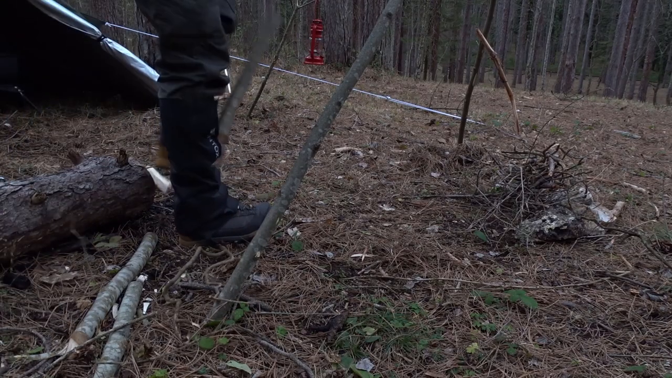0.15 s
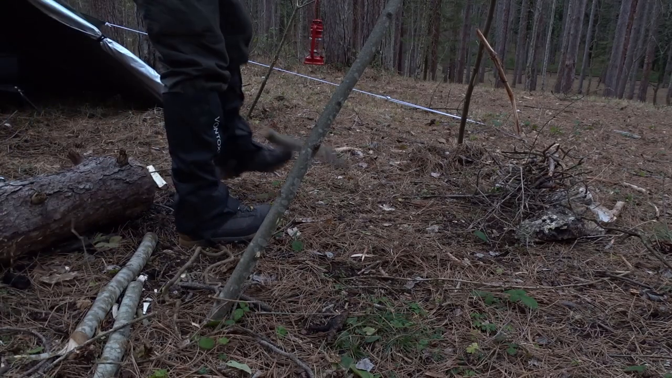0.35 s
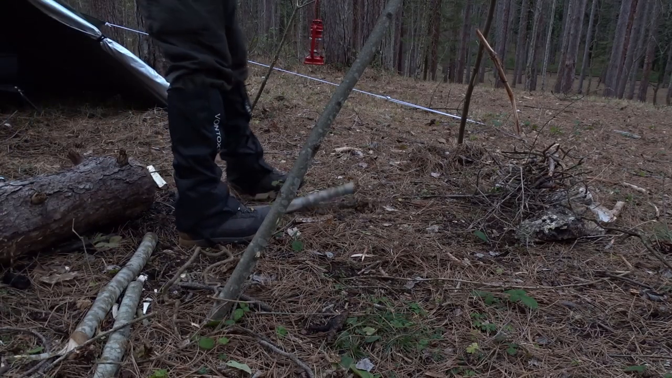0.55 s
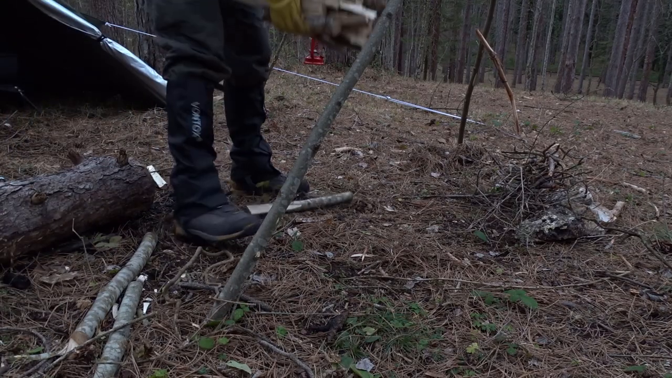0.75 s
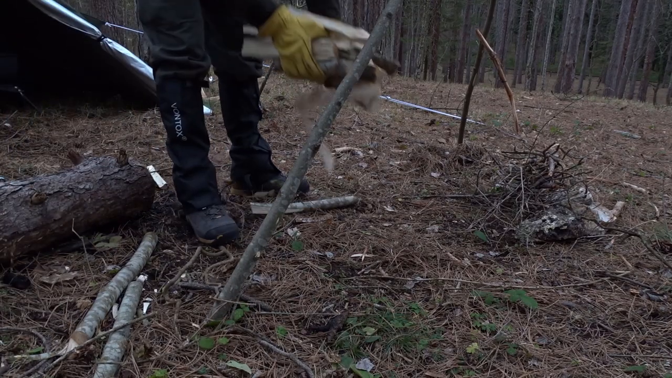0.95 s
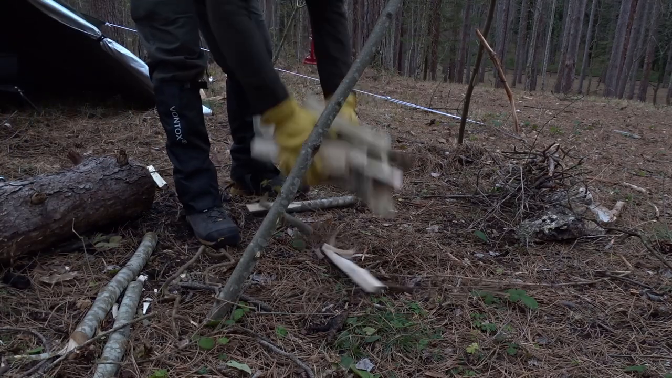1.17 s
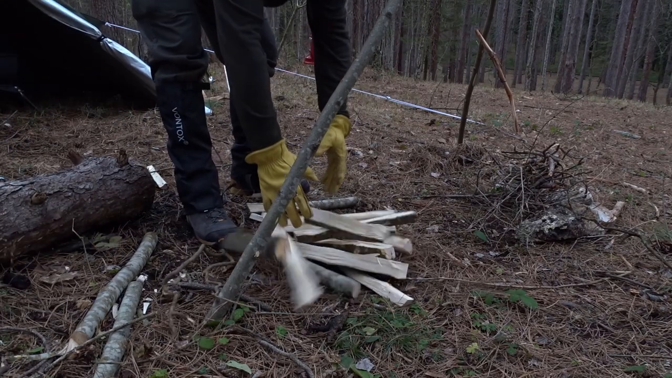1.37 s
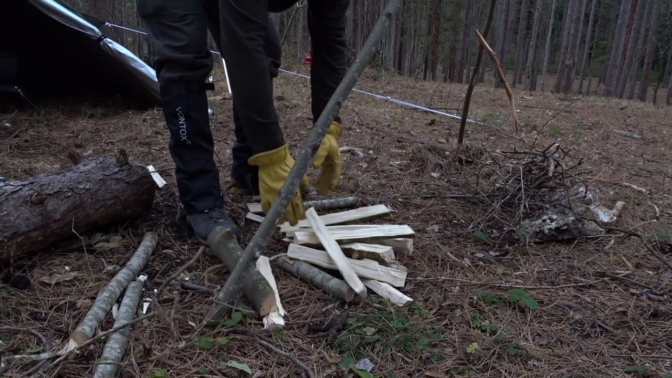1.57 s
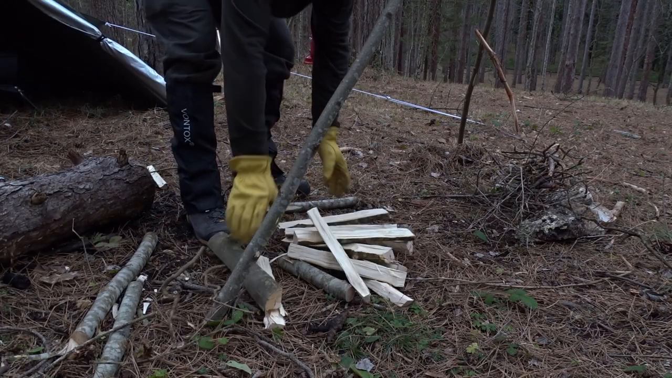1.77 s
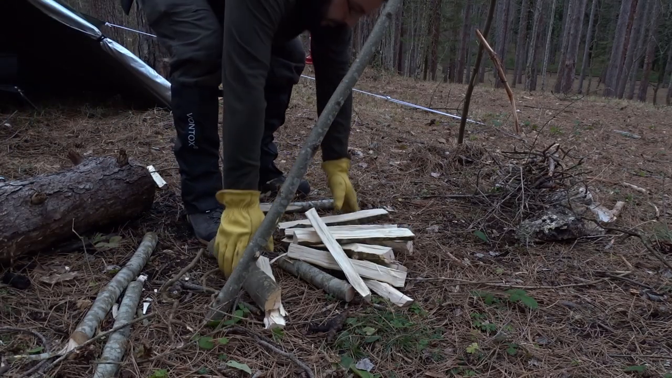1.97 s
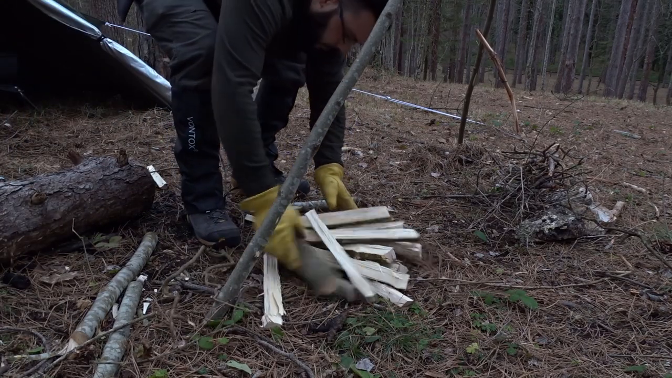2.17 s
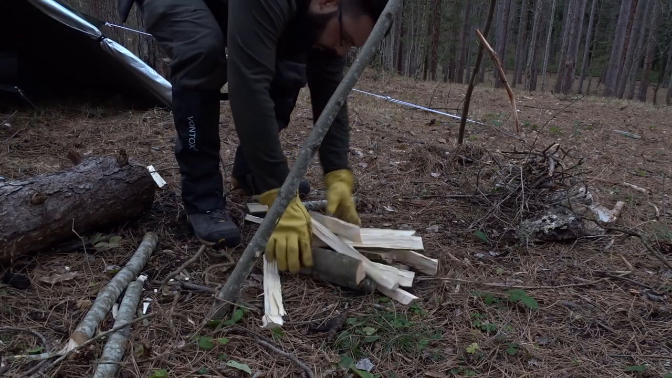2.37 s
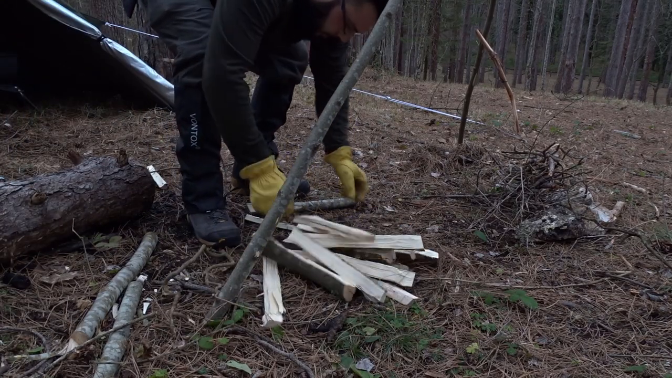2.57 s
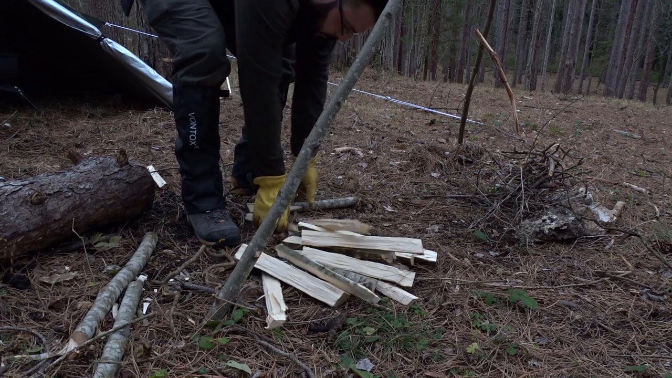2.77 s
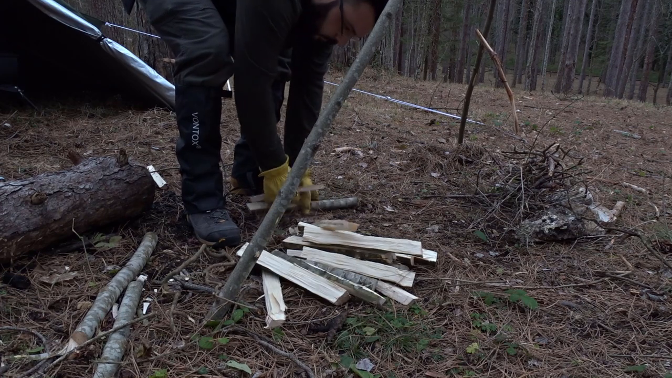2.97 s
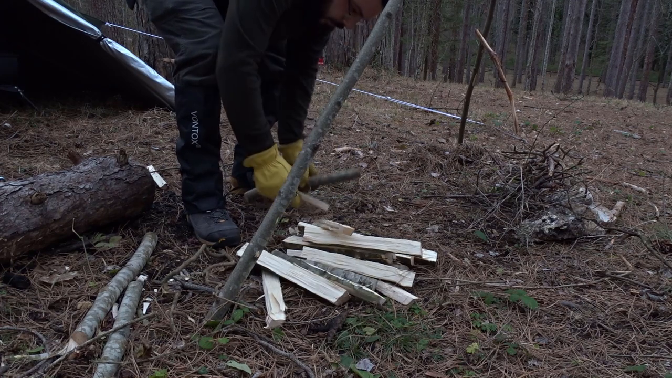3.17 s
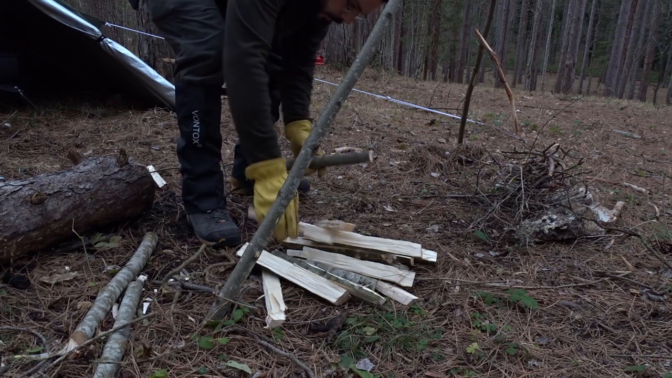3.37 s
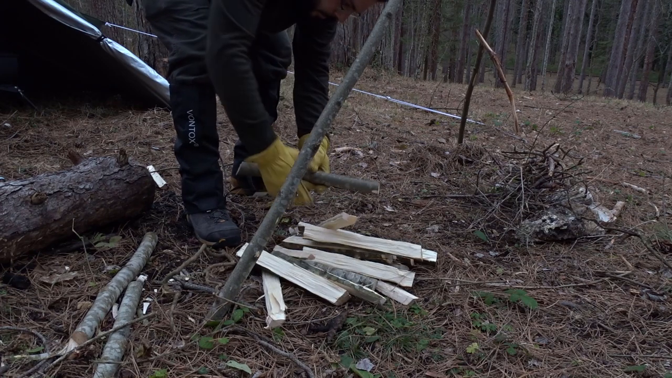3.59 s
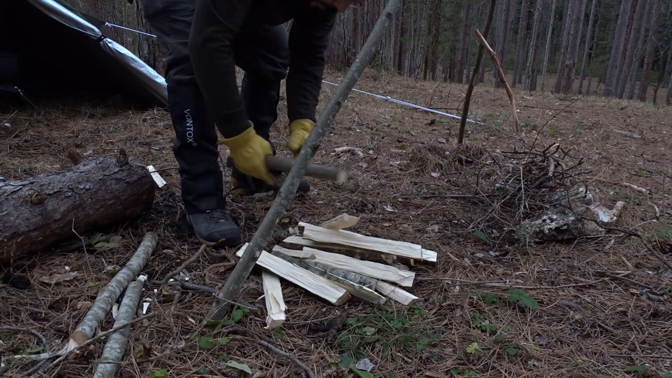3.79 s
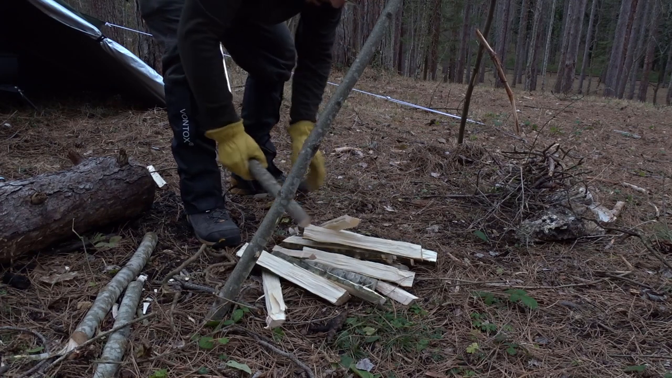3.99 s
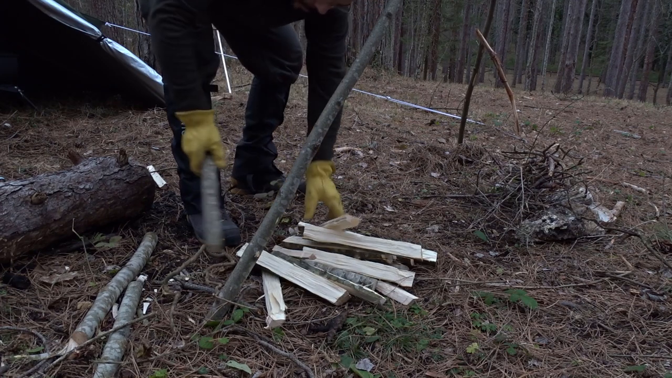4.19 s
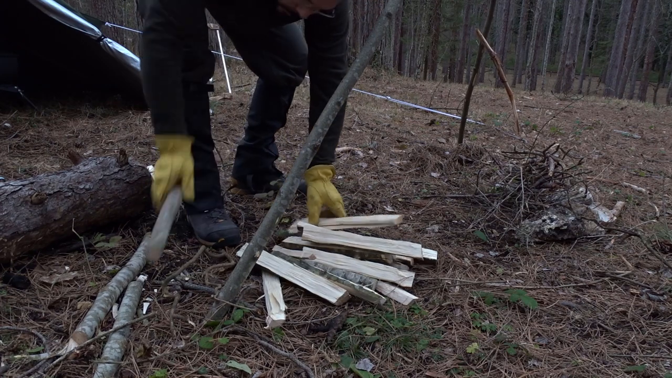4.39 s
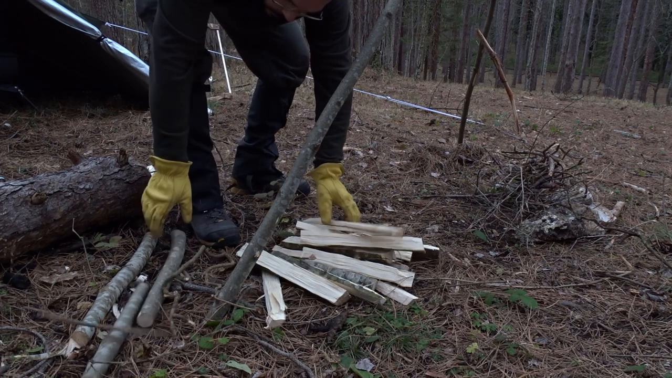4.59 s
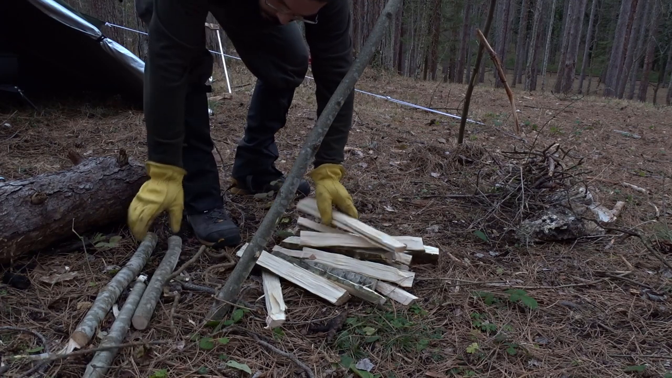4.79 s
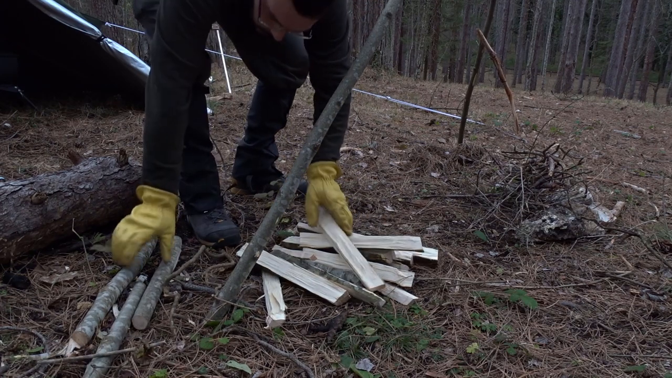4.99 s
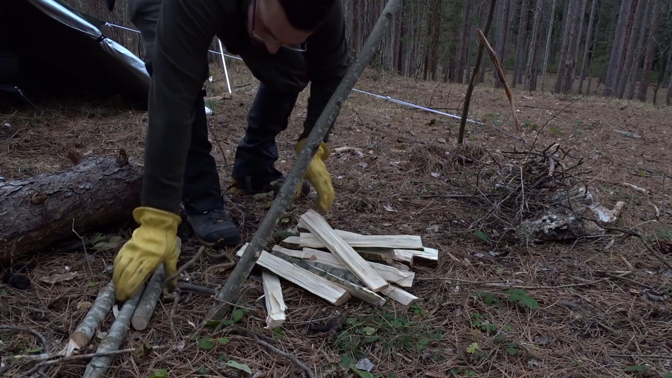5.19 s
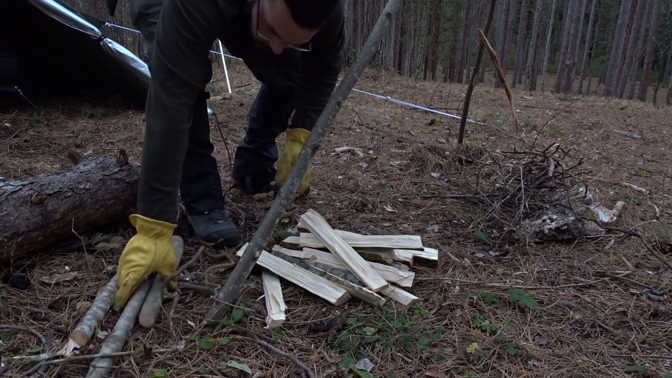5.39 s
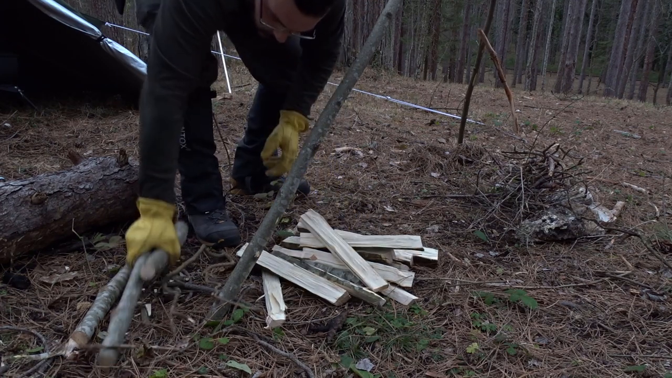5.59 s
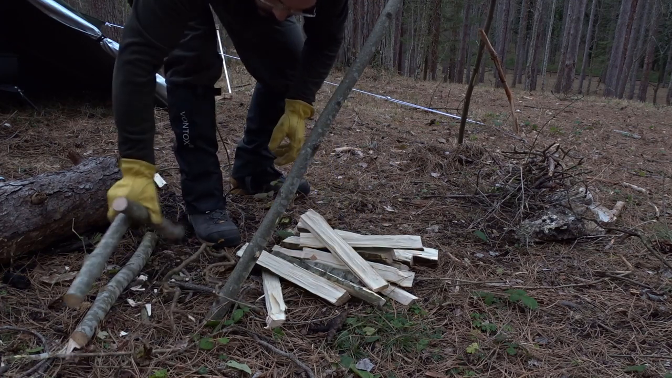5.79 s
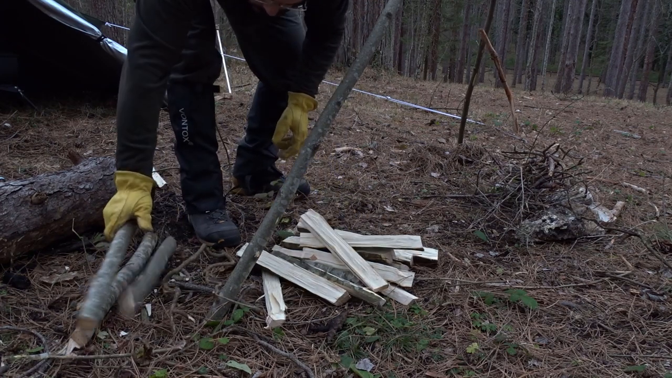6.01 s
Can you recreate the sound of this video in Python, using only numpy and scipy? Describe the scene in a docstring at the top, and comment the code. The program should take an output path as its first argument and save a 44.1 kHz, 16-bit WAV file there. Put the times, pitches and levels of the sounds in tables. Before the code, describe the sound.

An armful of dry split firewood clatters onto needle-covered forest ground, then pieces are shifted and knocked together, ending with a bright woody clonk.

```python
"""In a forest, split firewood is dropped on pine needles and arranged by gloved hands.
Pieces knock, ring and clatter as decaying tones with bursts of noise; twigs snap and the ground thuds.
Shaped noise makes the needles, scraping wood, rubbing gloves and light wind; rubbed surfaces squeak.
Faint echoes follow the blows. Both channels share the scene, each with a little hiss,
and the hardest blows clip."""
import sys
import numpy as np
from scipy import signal
from scipy.fft import rfft, irfft, next_fast_len
from scipy.io import wavfile
from scipy.ndimage import map_coordinates

SR = 44100
rng = np.random.default_rng(int(sys.argv[2]) if len(sys.argv) > 2 else 0)


def waveform_to_disk(signal):
    """Save audio, clipped to [-1, 1], as 16-bit WAV at the path in sys.argv[1]."""
    frames = np.transpose(np.atleast_2d(signal))
    scaled = np.clip(frames, -1, 1) * 32767
    samples = np.round(scaled).astype(np.int16)
    wavfile.write(sys.argv[1], SR, samples)


N = 266805  # length in samples

# Ringing tones of the heap of split pieces: pitch_hz [Hz], relative level_db [dB], t60_s [s to fall 60 dB]
HEAP_MODES = [(659, -6, 0.13), (740, -6, 0.13), (1020, 8, 0.054), (1250, -7, 0.074), (1310, -13, 0.043),
              (1920, -15, .05), (2350, -4, 0.087), (3040, -6.5, 0.022), (4010, -3, 0.023)]
# Small pieces radiate little bass: pitch_hz [Hz], gain_db [dB]
SMALL_PIECE_GAIN = [(30, -30), (300, -6), (550, 0), (22050, 0)]
THUD_T60_S = 0.039  # time for a low push to fall 60 dB


def amp(db):
    """Turn decibels into a plain multiplier."""
    return 10 ** (np.asarray(db) / 20)


def unit(x):
    """Scale a sound to an average (RMS) level of 1."""
    return x / np.sqrt(np.mean(x ** 2) + 1e-20)


def curves(rows):
    """One value per sample for each column after the time; silence outside the rows."""
    time_s, *columns = np.transpose(rows)
    clock = np.arange(N) / SR
    return [np.interp(clock, time_s, column, left=-120, right=-120) for column in columns]


def wobble(rate):
    """A smooth random curve through the given number of random points a second."""
    points = rng.standard_normal(int(N * rate / SR) + 4)
    return map_coordinates(points, [np.arange(N) * rate / SR])


def filtered(x, response):
    """Multiply the spectrum of x by a response that depends on frequency."""
    size = next_fast_len(len(x.T) + 8192)
    spectrum = rfft(x, size) * response(np.fft.rfftfreq(size, 1 / SR))
    return irfft(spectrum, size)[..., :len(x.T)]


def coloured(x, points):
    """Shape x by (Hz, dB) points joined along a logarithmic pitch axis."""
    pitch_hz, gain_db = np.transpose(points)

    def response(hz):
        return amp(np.interp(np.log(hz + 1), np.log(pitch_hz), gain_db, left=-120, right=-120))
    return filtered(x, response)


def ring(hz, t60, t):
    """One damped mode: a sine wave that falls 60 dB in t60 seconds."""
    return np.sin(2 * np.pi * hz * t) * amp(-60 * t / np.clip(t60, .003, .4))


def crackle(spiky_db, grain):
    """Noise made of tiny contacts: short grains of very unequal size, about grain seconds long."""
    size = amp(spiky_db * wobble(1 / grain))
    return unit(size * rng.standard_normal(N))


def wind():
    """Light air buffets the microphone: low noise whose level wanders."""
    # start_s [s], level_db [dB]
    gusts = [(0, -47), (.44, -45), (.94, -54.5), (1.35, -51), (1.58, -54.5), (2.17, -62), (2.8, -59.5),
             (3.28, -55), (3.6, -65.5), (4.24, -61), (4.75, -69), (5.02, -58.5), (6.05, -58.5)]
    # pitch_hz [Hz], relative level_db [dB per Hz]
    buffet_colour = [(8, -22), (25, -1.5), (50, -7.5), (90, -15), (160, -35.5)]
    level_db = curves(gusts)[0] + 2.5 * wobble(10)
    return amp(level_db) * unit(coloured(rng.standard_normal(N), buffet_colour))


def litter():
    """Needles crackle, wood scrapes on wood and the soft ground murmurs under boots and hands."""
    # Steady stirring: start_s [s], needles_db [dB before a final boost], scrape_db [dB], ground_db [dB]
    stirring = [(0, -42.5, -33.5, -50), (.1, -41.5, -47, -49), (.32, -57, -54, -53.5),
                (.45, -52, -47.5, -68), (.66, -45.5, -49.5, -46), (.95, -47, -41.5, -62),
                (1.26, -53, -55.5, -49), (1.4, -43, -34, -44.5), (1.55, -43.5, -41.5, -52),
                (1.7, -52, -53.5, -59), (1.95, -52, -59, -55.5), (2.2, -38.5, -40, -59.5),
                (2.33, -47.5, -40, -54), (2.5, -48, -47.5, -54), (3, -49, -52, -58),
                (3.12, -55.5, -58.5, -60.5), (3.56, -52.5, -48, -58), (3.9, -54, -59.5, -65),
                (4.09, -63, -57, -67), (4.38, -54.5, -52.5, -63.5), (4.55, -57, -56.5, -62),
                (5.15, -51.5, -54.5, -62), (5.45, -57, -55.5, -67.5), (5.75, -61.5, -61, -65.5),
                (6.05, -59.5, -57, -56)]
    # Bursts of crushed needles: peak_s [s], level_db [dB before the same boost],
    # fall_s [s to fall 20 dB; anything under 5 ms counts as 5 ms]
    rustles = [(0, -24, -0.0024), (.05, -44, -0.04), (0.134, -31.5, 0.01), (0.204, -31, 0.063),
               (.235, -44, 0.06), (.27, -59, 0.05), (.5, -45, -0.11), (.585, -48, 0.05), (.94, -34.5, .04),
               (.98, -28, 0.01), (1.11, -44, 0.16), (1.182, -35, 0.02), (1.22, -29, 0.0433),
               (1.33, -20, 0.0124), (1.36, -18.5, 0.01), (1.43, -33.5, .04), (1.48, -36.5, 0.1),
               (1.53, -36.5, 0.0948), (2.156, -36, 0.05), (2.19, -40, 0.13), (2.24, -46, 0.14),
               (2.29, -39.5, 0.16), (2.32, -44, 0.07), (2.345, -42, 0.06), (2.73, -49, 0.17),
               (2.78, -65, 0.2), (2.835, -41.5, 0.07), (2.88, -39, 0.07), (3.045, -50.5, .04),
               (3.31, -54.5, 0.24), (3.5, -45, 0.1), (3.555, -36, 0.02), (3.72, -52, 0.08),
               (3.885, -53, 0.02), (4.17, -56.5, 0.05), (4.38, -50, 0.18), (4.405, -59, 0.1),
               (4.43, -65, 0.4), (4.52, -57, 0.9), (4.577, -29.5, 0.05), (5.25, -64, 0.08),
               (5.28, -52, 0.06), (5.35, -50, 0.09), (5.425, -46, 0.27), (5.48, -48.5, 0.01),
               (5.61, -50.5, -0.08), (5.7, -47.5, -0.03), (5.855, -45.5, -0.08), (5.885, -49.5, 0.1),
               (5.98, -42, -0.1)]
    # Noise colours: pitch_hz [Hz], relative level_db [dB per Hz]
    needle_colour = [(900, -7.5), (1500, -6), (1900, -6.5), (2300, -5.5), (2550, -4), (2850, -0.5),
                     (3050, -3), (3300, -5), (3700, -10.5), (4300, -7), (5500, -9), (7300, -11.5),
                     (9700, -19.5), (12000, -35.5), (15000, -69.5)]
    scrape_colour = [(150, -40), (250, -5.5), (345, -4), (390, -4.5), (669, -6), (995, -8.5), (1580, -10),
                     (1970, -15), (2400, -11.5), (3120, -30), (5280, -120)]
    ground_colour = [(60, -42.5), (100, -4), (200, -1.5), (350, -13.5), (600, -20.5)]
    rise_share = .6  # rise time over fall time

    needles_db, scrape_db, ground_db = curves(stirring)
    clock = np.arange(N) / SR
    bursts = np.zeros(N)
    for peak_s, level_db, fall_s in rustles:
        distance_s = np.maximum(clock - peak_s, (peak_s - clock) / rise_share)
        bursts += amp(level_db - 20 * distance_s / max(fall_s, .005))
    stir = wobble(25)
    needle_level = (amp(needles_db) + bursts) * amp(2.2 * stir)
    needles = needle_level * coloured(crackle(2.45, 0.0023), needle_colour)

    drag = amp(scrape_db)
    unsteady_db = 2.2 * stir + 1.5 * wobble(30)
    scrape = drag * amp(unsteady_db) * unit(coloured(crackle(1.9, .004), scrape_colour))
    # scraping also wakes the modes of the heap in tiny random taps, about 25 a second for each mode
    t = np.arange(SR // 8) / SR
    for hz, level_db, t60 in HEAP_MODES:
        taps = drag * (rng.random(N) < 25 / SR) * rng.standard_normal(N)
        scrape += amp(level_db + 5.5) * signal.fftconvolve(taps, ring(hz, 0.15 * t60, t))[:N]

    lumps_db = 3 * wobble(20)
    ground = amp(ground_db + lumps_db) * unit(coloured(rng.standard_normal(N), ground_colour))
    return amp(11.0) * needles + scrape + ground


def rubs():
    """A glove sliding along a piece keeps one mode humming: noise in one narrow band of pitch."""
    # start_s [s], length_s [s], pitch_hz [Hz], level_db [dB]
    slides = [(2.36, .1, 2850, -52), (3.24, .17, 2500, -56), (3.26, .12, 2950, -57), (3.24, .25, 1330, -57),
              (3.26, .1, 690, -55), (3.58, .08, 1800, -58), (3.78, .15, 2250, -56), (3.8, .11, 2850, -57),
              (4.09, .12, 1800, -62), (4.27, .15, 1050, -55), (4.42, .13, 2300, -58),
              (4.82, .06, 2200, -54), (5.29, .24, 2110, -54), (.47, .06, 2900, -48), (.22, .05, 2900, -42)]
    out = np.zeros(N)
    for start_s, length_s, hz, level_db in slides:
        n = round(length_s * SR)
        carrier = 2 * np.pi * hz * np.arange(n) / SR
        hum = wobble(90)[:n] * np.sin(carrier) + wobble(90)[:n] * np.cos(carrier)
        out[round(start_s * SR):][:n] += amp(level_db) * np.sqrt(np.hanning(n)) * hum
    return out


def squeaks():
    """Rubbing surfaces whistle briefly: short rough tones that glide up as the rubbing speeds up."""
    # start_s [s], length_s [s], start_hz [Hz], end_hz [Hz], level_db [dB before the random flutter]
    whistles = [(.03, .04, 1250, 1400, -38), (.085, .03, 1600, 1800, -38), (.105, .065, 2450, 3350, -31),
                (.133, .02, 1900, 2600, -33), (.125, .03, 3700, 5800, -40), (3.872, .025, 1400, 1420, -45),
                (3.872, .025, 2800, 2850, -48), (4.915, .03, 4300, 4350, -50)]
    out = np.zeros(N)
    flutter = amp(3 * wobble(150))
    pitch_waver = 1 + .015 * wobble(300)
    for start_s, length_s, start_hz, end_hz, level_db in whistles:
        i, n = round(start_s * SR), round(length_s * SR)
        pitch_hz = np.linspace(start_hz, end_hz, n) * pitch_waver[i:i + n]
        phase = 2 * np.pi * np.cumsum(pitch_hz) / SR
        out[i:i + n] += amp(level_db) * np.hanning(n) * np.sin(phase)
    return out * flutter


def trunks(x):
    """Faint echoes from ground and trunks; rough bark and needles scatter phases and smear clear tones."""
    # pitch_hz [Hz], relative level_db [dB]
    echo_colour = [(300, -20), (900, -6.5), (1800, -8), (2600, -6), (3500, -2), (4100, -11), (9000, -17.5)]
    echo_t60_s = .42
    pieces = signal.stft(x, nperseg=96)[2]
    scattered = pieces * np.exp(2j * np.pi * rng.random(pieces.shape))
    smeared = signal.istft(scattered, nperseg=96)[1][:N]
    t = np.arange(SR // 2) / SR
    tail = coloured(rng.standard_normal(len(t)), echo_colour) * amp(-60 * t / echo_t60_s)
    # the echoes start 300 samples (about 7 ms) late
    tail = np.pad(tail / np.linalg.norm(tail), (300, 0))
    return signal.fftconvolve(smeared, tail)[:N]


def thuds():
    """Boots and heavy pieces thump the soft ground, which answers with one short low push."""
    # start_s [s], pitch_hz [Hz], level_db [dB]
    thumps = [(0.04, 157, -22), (.172, 337.6, -19), (.181, 368.6, -27), (.48, 170.2, -22.5),
              (0.581, 144, -25), (.913, 400.4, -24.5), (1.219, 182, -24.5), (1.326, 395, -15.5),
              (1.352, 362.6, -11.5), (1.389, 81.7, -27.5), (1.419, 80.7, -22), (2.31, 388, -27),
              (2.332, 282, -26.5), (2.339, 219.3, -25.5), (2.368, 228.5, -36), (2.494, 224, -34),
              (2.522, 265.7, -31.5), (3.607, 194.8, -37.5), (4.559, 200, -27.5), (4.901, 270, -44),
              (4.319, 385, -31)]
    out = np.zeros(N + SR)
    t = np.arange(SR // 4) / SR
    rise = 1 - np.exp(-t / 0.0005)
    for start_s, hz, level_db in thumps:
        out[round(start_s * SR):][:len(t)] += amp(level_db) * ring(hz, THUD_T60_S, t) * rise
    return out[:N]


def snaps():
    """Dry twigs and splinters snap: a sharp tick and a few milliseconds of bright noise."""
    # start_s [s], level_db [dB]
    breaks = [(.001, -20.5), (.481, -39), (.664, -45.5), (.691, -34.5), (.735, -42), (.763, -32),
              (.786, -36), (.978, -21.5), (1.106, -39), (1.316, -27), (1.326, -21), (1.389, -29.5),
              (1.439, -25.5), (2.152, -25.5), (2.231, -29.5), (2.341, -25.5), (2.467, -43.5), (2.602, -33),
              (2.727, -31), (2.7715, -33.5), (2.893, -36.5), (3.506, -18.5), (3.539, -41), (3.554, -34.5),
              (4.569, -17), (5.224, -43.5), (5.348, -45), (5.418, -38.5), (5.474, -32), (5.599, -46),
              (5.691, -44.5), (5.848, -41.5), (5.969, -46)]
    # pitch_hz [Hz], relative level_db [dB per Hz]
    snap_colour = [(5000, -28.5), (7000, 7), (9500, -3.5), (12000, -19.5), (16000, -41.5)]
    out = np.zeros(N + SR)
    t = np.arange(SR // 20) / SR
    sharp = unit(coloured(rng.standard_normal(N + SR), snap_colour))
    fade = amp(-60 * t / 0.0094) + amp(-5 - 60 * t / 0.00086)
    for start_s, level_db in breaks:
        i = round(start_s * SR)
        now = slice(i, i + len(t))
        out[now] += amp(level_db) * sharp[now] * fade
    return out[:N]


def tumble():
    """Clattering pieces: a dense hail of blows excites the heap, each mode by its own blows."""
    # A list of clatters, each with rows of: time_s [s], relative level_db [dB]
    clatters = [
        [(1.322, -37.5), (1.33, -10.5), (1.343, -2.5), (1.357, 1), (1.372, -10), (1.41, -40)],
        [(.168, -37.5), (.175, -17.5), (.19, -24), (.215, -25), (.245, -51)],
        [(2.2, -53), (2.235, -30.5), (2.246, -26), (2.27, -28), (2.3, -33), (2.34, -30), (2.37, -49.5)],
    ]
    # Noise colours: (Hz, relative dB per Hz)
    clatter_colour = [(100, -18), (700, 3), (3000, -1.5), (8000, -18.5), (16000, -48.5)]
    boom_colour = [(55, -28), (85, -1.5), (140, -1.5), (300, -6.5)]
    t = np.arange(SR // 4) / SR
    force = sum(amp(curves(rows)[0]) for rows in clatters)
    out = force * amp(-6.5) * unit(coloured(crackle(7.5, 0.0027), clatter_colour))
    # the weight of the load booms in the soft ground
    out += force * amp(-23) * unit(coloured(rng.standard_normal(N), boom_colour))
    # about 500 random blows a second for each mode
    for hz, level_db, t60 in HEAP_MODES:
        blows = force * (rng.random(N) < 500 / SR) * rng.standard_normal(N)
        out += amp(level_db - 15.5) * signal.fftconvolve(blows, ring(hz, t60, t))[:N]
    return out


def ringing():
    """A round branch, a thin piece and a split piece lie free enough to ring clearly in several modes."""
    # Modes of each piece: pitch_hz [Hz], relative level_db [dB], t60_s [s to fall 60 dB]
    branch_modes = [(657, -20.5, 0.3), (833, -18.5, 0.22), (1230, -26, 0.16), (1636, -11, 0.21),
                    (1683, -6.5, 0.14), (2014, -1, 0.1), (2450, -25, .08), (2900, -27.5, 0.15),
                    (3220, -25, 0.11)]  # tossed onto others
    slat_modes = [(727, -18.5, 0.19), (1524, -0.5, 0.09), (2886, -1.5, 0.086), (4040, 6, 0.015)]  # thin piece bouncing on the heap
    stick_modes = [(740.4, -5.5, 0.16), (1120, -18, 0.064), (1882, -9, 0.075), (2170, -27, 0.038),
                   (3050, -29, 0.049)]  # split piece set on the pile
    # Blows on branch and thin piece: start_s [s], relative level_db [dB]
    branch_blows = [(4.569, 2.5), (4.71, -35.5)]
    slat_blows = [(1.522, -10.5), (1.534, -24), (1.612, -34)]
    # start_s [s], relative level_db [dB], hardness_db [dB per octave above the first mode]
    stick_blows = [(4.978, -8, 3), (5.061, -8.5, 1.5)]

    out = np.zeros(N + SR)
    t = np.arange(SR // 2) / SR
    rise = 1 - np.exp(-t / 0.000094)
    for blows, modes in ((branch_blows, branch_modes), (slat_blows, slat_modes)):
        for start_s, blow_db in blows:
            tones = sum(amp(blow_db + mode_db) * ring(hz, t60, t) for hz, mode_db, t60 in modes)
            out[round(start_s * SR):][:len(t)] += rise * tones
    first_hz = stick_modes[0][0]
    for start_s, blow_db, hardness_db in stick_blows:
        tones = np.zeros(len(t))
        for hz, mode_db, t60 in stick_modes:
            # a harder blow favours the higher modes
            bright_db = hardness_db * np.log2(hz / first_hz)
            tones += amp(blow_db + mode_db + bright_db) * ring(hz, t60, t)
        out[round(start_s * SR):][:len(t)] += rise * tones
    return coloured(out[:N], SMALL_PIECE_GAIN)


def knocks():
    """Each contact bends a piece in two modes, cracks on the grain and nudges the heap."""
    # start_s [s], level_db [dB], low_hz [Hz], low_db [dB], low_t60_s [s to fall 60 dB],
    # high_hz [Hz], high_db [dB], crack_db [dB]; the last three dB columns are relative to level_db
    contacts = [(.001, -6.5, 1095, -10, 0.035, 1400, -11.5, -20),
                (.038, -15, 457, -8, 0.024, 1330, -16, -26), (0.111, -21.5, 752, -17, 0.066, 2530, -7, -7),
                (.172, -1, 887, -4, 0.022, 1500, -13, -25), (.181, -10, 748, -2, 0.09, 1370, -4, -24),
                (.194, -9.5, 850, 3, 0.023, 2760, -21, -28), (.294, -23, 657, -21, 0.076, 2500, -3.5, -13),
                (.391, -35, 492, 1, 0.12, 2970, -20, -25), (.402, -32.5, 506, 3, .09, 2850, -22, -26),
                (.481, -21.5, 654, -16, 0.033, 2850, -7, -12), (.529, -23.5, 513, -15, 0.18, 2550, -9, -8),
                (.582, -14.5, 540, -10.5, 0.034, 2910, -9.5, -14.5),
                (.649, -8.5, 1025, -14, 0.023, 2290, -10.5, -24.5),
                (.664, -20.5, 584, -13, 0.071, 2820, -14, -10),
                (.691, -15.5, 1260, -30, .06, 1340, -11, -16),
                (0.764, -20.5, 540, -29, 0.055, 2110, -31, -15), (.786, -26, 452, -27, .06, 2760, -6, -5),
                (.863, -26, 856, -17, .06, 1360, -12, -19), (.915, -16, 1016, -15, 0.14, 1430, -3, -37),
                (.932, -13, 717, -9, 0.037, 1650, -8, -17), (.971, -14, 1020, -31, 0.037, 2430, -3, -16),
                (.978, -10, 1240, -34.5, .06, 2710, -6, -9), (.997, -21, 775, -12.5, 0.16, 1530, -5, -17),
                (1.024, -25, 530, -12, .06, 2430, -7, -8), (1.074, -22, 1030, -5, 0.054, 1540, -9, -17.5),
                (1.107, -25.5, 554, -14, .067, 2250, -5, -9), (1.129, -25.5, 940, -28, .06, 1880, -4, -18),
                (1.189, -6, 676, -10.5, 0.09, 2780, -10.5, -24),
                (1.191, -13.5, 1800, -10, 0.056, 3300, -12, -30),
                (1.204, -9, 685, -13, .066, 3320, -12, -14),
                (1.219, -10.5, 673, -14, 0.12, 1850, -21, -12.5),
                (1.239, -18, 678, -12, 0.07, 2620, -13, -9), (1.267, -27, 660, 0, 0.074, 1680, -23, -20),
                (1.296, -26, 688, -17, .06, 2840, -16, -5), (1.315, -12.5, 875, -12, .06, 1340, -9, -5),
                (1.326, 6, 1150, -19, .031, 2790, 1, -9.5), (1.343, 4.5, 1056, -2, 0.029, 1320, -5, -26.5),
                (1.352, 9.5, 1170, -18, 0.12, 1390, 0, -28.5), (1.389, -10, 640, -4, 0.08, 2230, -15, -11),
                (1.417, -10, 462, -15, 0.017, 1160, -5, -16.5),
                (1.4205, 10.5, 743, -25, .082, 2220, -12, -22),
                (1.439, -14.5, 737, -8, 0.14, 3030, -19, -12),
                (1.452, -12, 744, -21, .06, 2210, -17, -16.5),
                (1.463, -4.5, 625, -14.5, 0.046, 3920, -6.5, -8.5),
                (1.494, -19.5, 914, -7, 0.056, 1360, -11, -29), (1.511, -22, 970, -6, 0.064, 2500, 0, -7),
                (1.521, -3, 915, -17, 0.044, 3020, -3.5, -11.5),
                (1.525, -5.5, 1297, -51, .036, 1640, -8, -20.5),
                (1.533, -4, 452, -36, .055, 2820, 2.5, -26), (1.539, -9.5, 750, -12.5, 0.1, 1460, -19, -15),
                (1.567, -18, 764, -26, .06, 2800, -15, -6.5), (1.612, -17, 745, -9, 0.12, 2900, -9, -5.5),
                (1.629, -25, 747, -6.5, 0.12, 1510, -19, -3), (1.664, -27, 780, -19, 0.058, 2940, -8, -7.5),
                (1.856, -22.5, 580, 7.5, 0.013, 1590, -32, -31),
                (2.103, -24.5, 1110, -15, .06, 2280, -2, -6.5),
                (2.152, -12, 1040, -17.5, .056, 2820, -5.5, -9),
                (2.164, -22, 627, -10.5, 0.2, 1890, -18, -24),
                (2.189, -13, 1020, -15, 0.16, 2700, -35, -22),
                (2.211, -3.5, 774, -2.5, 0.021, 1400, -5.5, -16),
                (2.231, -17, 815, -29, .055, 1960, -18, -6), (2.237, -3, 777, -7.5, 0.065, 3610, -9, -4.5),
                (2.242, 1, 1026, -9.5, 0.069, 2400, -9, -26.5),
                (2.261, -6, 625, -7.5, 0.033, 1250, -11, -34),
                (2.289, -0.5, 870, -11.5, .036, 2650, -5, -17),
                (2.304, -16.5, 480, -4, 0.021, 1890, -18, -22),
                (2.316, -20.5, 762, -17, .053, 3180, -5, -22),
                (2.334, -11.5, 486, -5, 0.018, 2000, -25, -23),
                (2.341, -12, 930, -18, 0.037, 2540, -12, -13), (2.369, -22, 673, -8, 0.07, 2850, -18, -26),
                (2.467, -26.5, 970, -10.5, .06, 2900, -0.5, -14.5),
                (2.494, -21, 760, -7, 0.054, 1490, -18, -23.5),
                (2.523, -23, 1010, -16, 0.07, 2800, -15, -11),
                (2.555, -28, 760, -6.5, 0.073, 1920, -7, -10),
                (2.6, -26.5, 1180, -26.5, .055, 2400, -2.5, -5),
                (2.633, -12, 638, -10.5, 0.1, 1670, -12.5, -21),
                (2.667, -23, 537, -6, .038, 1910, -9, -20.5),
                (2.686, -13.5, 1156, -13, 0.08, 1930, -9, -25),
                (2.711, -21.5, 1260, -30, .06, 2960, -3, -27), (2.726, -16, 1260, -30, .06, 1400, -8.5, -5),
                (2.7713, -11, 1170, -19, 0.04, 2680, -6, -4.5),
                (2.877, -21.5, 638, -10, 0.2, 1680, -8, -21),
                (2.893, -11.5, 863, -17, 0.052, 2560, -15, -31),
                (2.939, -29, 720, -2, 0.04, 1440, -19, -19), (3.163, -34, 585, -3, .045, 2610, -24, -13),
                (3.289, -31, 687, -5, 0.093, 1420, -17, -28), (3.377, -29.5, 610, -6, 0.028, 1370, -5, -16),
                (3.466, -35, 1150, -11, .055, 1390, 4, -15.5), (3.502, -17, 960, -26, .06, 2600, -9, 0.5),
                (3.506, -2.5, 1260, -30, 0.045, 3510, -15, -1.5),
                (3.512, -19.5, 767, -9, .11, 2270, -23, -34), (3.539, -26, 886, -5.5, .076, 2660, -16, -24),
                (3.554, -19, 890, -20, 0.11, 2060, -7, -14), (3.607, -28, 853, -15, 0.14, 2970, -4, -22.5),
                (3.705, -24, 527, -15, 0.048, 1310, -14.5, -23),
                (3.719, -29.5, 1260, -19, .05, 1300, -5, -17),
                (4.283, -28.5, 1017, -4, 0.046, 2370, -7, -21),
                (4.318, -18.5, 676, -7, 0.036, 1700, -10.5, -24),
                (4.421, -20.5, 1190, -36, .06, 2420, -14, -13), (4.52, -25, 1110, -41, .045, 2930, -3, -6),
                (4.569, 11.5, 826, -59, 0.035, 2086, -14.5, -34.5),
                (4.711, -19.5, 661, -9.5, 0.2, 1660, -5, -21),
                (4.739, -18.5, 643, -16, 0.07, 2030, -15.5, -17),
                (4.792, -23, 1160, -13, 0.028, 1950, -8, -21.5),
                (4.816, -26.5, 880, -13, 0.036, 2130, -6, -19),
                (4.91, -20, 1180, -18.5, .047, 1970, -17.5, -9.5),
                (4.978, -9, 785, 3, 0.009, 1650, -7.5, -36),
                (5.016, -27, 720, -15, 0.098, 1910, -22, -10.5),
                (5.061, -8.5, 740, -11.5, 0.046, 1870, -30, -22.5),
                (5.094, -22.5, 770, -11, .042, 1960, -18, -14.5),
                (5.2115, -18, 797, -15.5, 0.041, 1970, -9.5, -25.5),
                (5.278, -36, 950, -10, 0.042, 1310, -13, -15),
                (5.298, -26.5, 1000, -25, .06, 2750, -12.5, -4.5),
                (5.348, -26.5, 1050, -16, .048, 2100, -17, -11),
                (5.365, -22, 1150, -23, 0.028, 2110, -17, -25),
                (5.419, -27.5, 850, -32, .06, 2110, -16, -5.5),
                (5.473, -29.5, 1186, -31, 0.061, 2130, -6, -4),
                (5.691, -20, 446, -21, 0.048, 2810, -14, -17.5),
                (5.848, -30, 1050, -23.5, 0.056, 2750, -18.5, -8),
                (6.035, -32, 820, -5, 0.044, 1950, -5, -18.5)]
    # Noise colours: pitch_hz [Hz], relative level_db [dB per Hz]
    crack_colour = [(2000, -30), (3500, 10), (5000, 5), (6500, 1.5), (8500, -19.5)]
    snap_colour = [(5000, -28.5), (7000, 7), (9500, -3.5), (12000, -19.5), (16000, -41.5)]
    grain_colour = [(300, -4.5), (700, -3.5), (1500, -1.5), (3000, -3.5), (4500, -20)]
    high_t60_s, blur_t60_s, crack_t60_s = 0.017, 0.035, 0.013
    blur_db, body_db = -15, -27  # relative to the contact's level
    snap_db = -14  # relative to the crack
    body_hz = 336  # typical pitch of the nudged heap

    out = np.zeros(N + SR)
    t = np.arange(SR // 4) / SR
    crisp = unit(coloured(rng.standard_normal(N + SR), crack_colour))
    sharp = unit(coloured(rng.standard_normal(N + SR), snap_colour))
    wood = unit(coloured(rng.standard_normal(N + SR), grain_colour))
    rise = 1 - np.exp(-t / 0.00039)
    tick = amp(-0.5 - 60 * t / 0.0018)  # the very first touch is sharpest
    crack_fade = amp(-60 * t / crack_t60_s) + tick
    # each contact meets the heap at another spot, which shifts the body's pitch
    spots = rng.normal(0, 0.12, len(contacts))
    for contact, spot in zip(contacts, spots):
        start_s, level_db, low_hz, low_db, low_t60_s, high_hz, high_db, crack_db = contact
        i = round(start_s * SR)
        now = slice(i, i + len(t))
        bend = amp(low_db) * ring(low_hz, low_t60_s, t)
        bend += amp(high_db) * ring(high_hz, high_t60_s, t)
        # the many short-lived higher modes blur into a brief woody noise
        blur = amp(blur_db - 60 * t / blur_t60_s) * wood[now]
        crack = amp(crack_db) * (crisp[now] + amp(snap_db) * sharp[now]) * crack_fade
        body = amp(body_db) * ring(body_hz * np.exp(spot), THUD_T60_S, t)
        out[now] += amp(level_db) * rise * (bend + blur + crack + body)
    return coloured(out[:N], SMALL_PIECE_GAIN)


def scene():
    """Add all sources and the echoes of the blows; both channels hear the same sound."""
    blows = thuds() + snaps() + tumble() + ringing() + knocks()
    echoes = amp(-29) * trunks(blows)
    mix = wind() + litter() + rubs() + squeaks() + echoes + blows
    return np.tile(mix, (2, 1))


def record(dry):
    """The microphone dulls the top, each channel adds its own hiss, the converter clips and limits the band."""
    # Microphone response: pitch_hz [Hz], gain_db [dB]
    mic_response = [(5, -0.5), (150, 1), (9000, -1), (11500, -6.5), (13500, -23), (22000, -40.5)]
    # Amplifier noise: pitch_hz [Hz], relative level_db [dB per Hz]
    hiss_colour = [(15, -30), (25, 7), (196, -4), (243, -6), (404, -8), (1630, -12), (4750, -12),
                   (11200, -23.5), (13100, -33), (15000, -60.5)]
    hiss_db, top_hz = -58.5, 16400
    hiss = amp(hiss_db) * unit(coloured(rng.standard_normal(dry.shape), hiss_colour))
    clipped = np.clip(coloured(dry, mic_response) + hiss, -1, 1)
    band_limited = filtered(clipped, lambda hz: hz < top_hz)
    return np.clip(band_limited, -1, 1)


dry = scene()
out = record(dry)
waveform_to_disk(out)
```